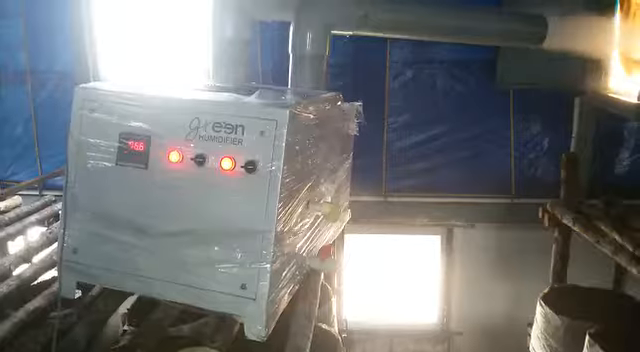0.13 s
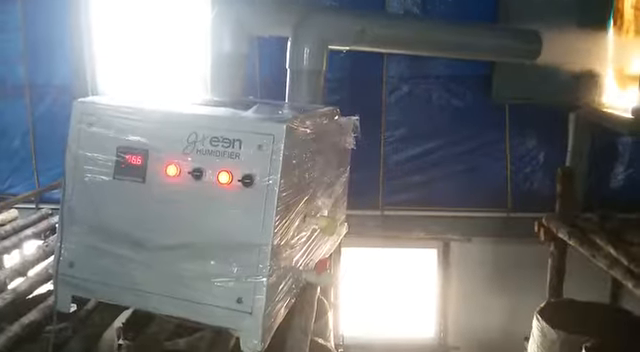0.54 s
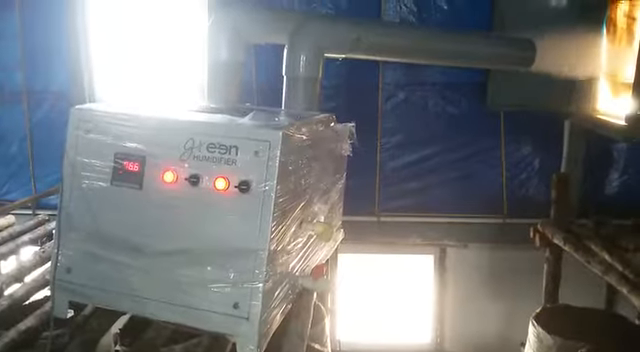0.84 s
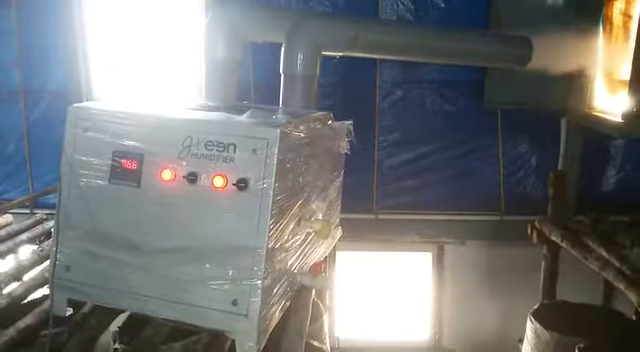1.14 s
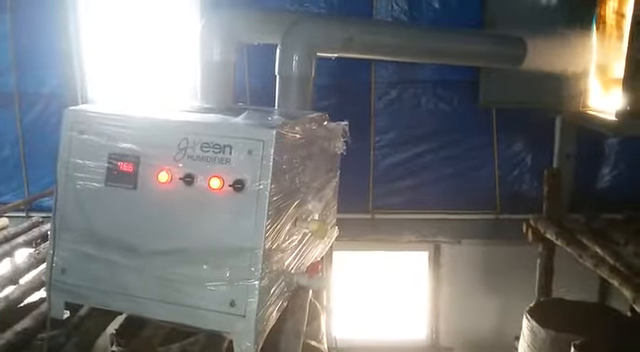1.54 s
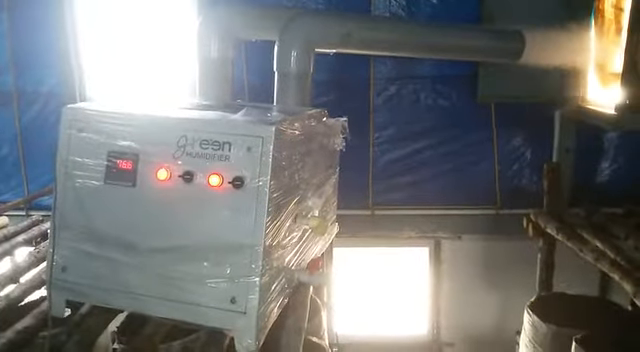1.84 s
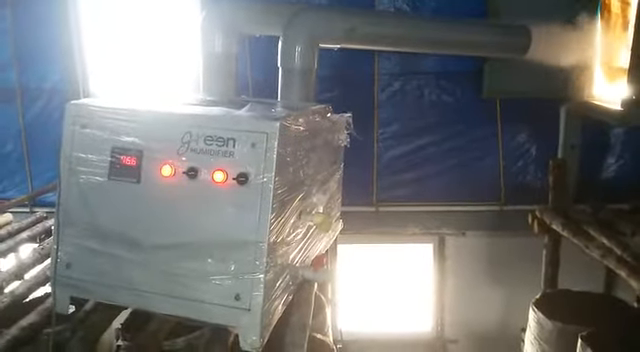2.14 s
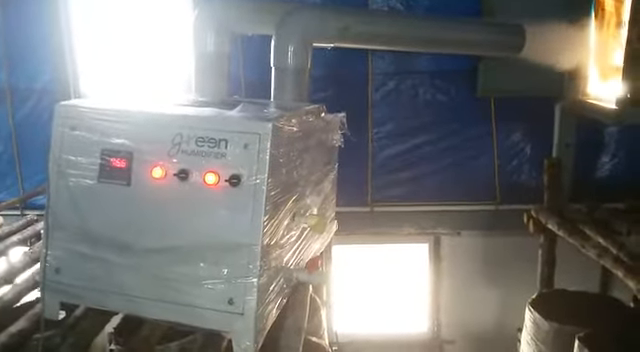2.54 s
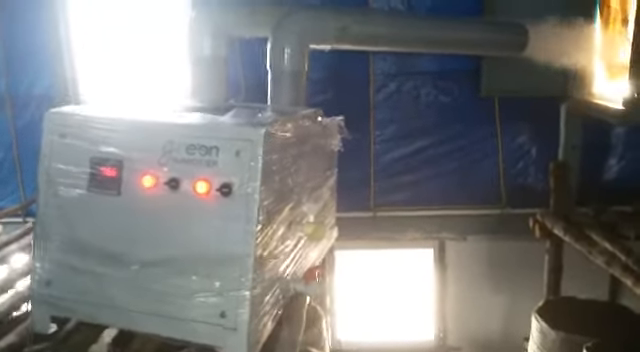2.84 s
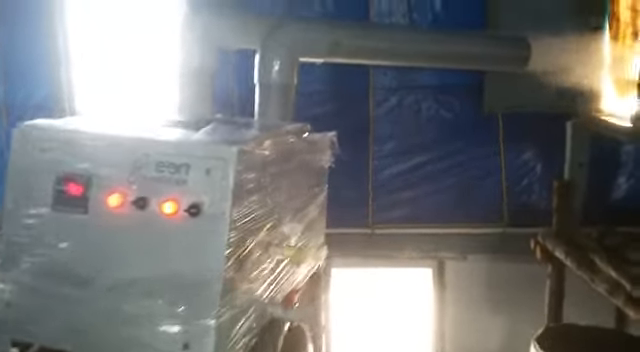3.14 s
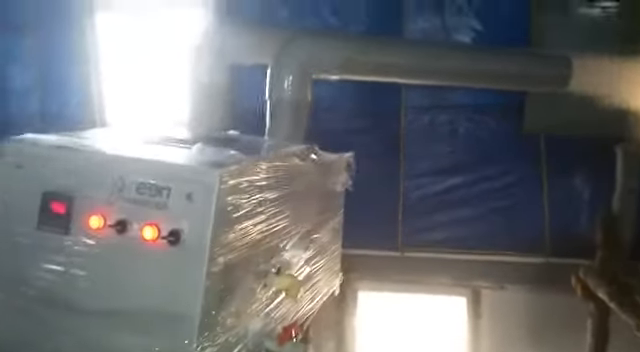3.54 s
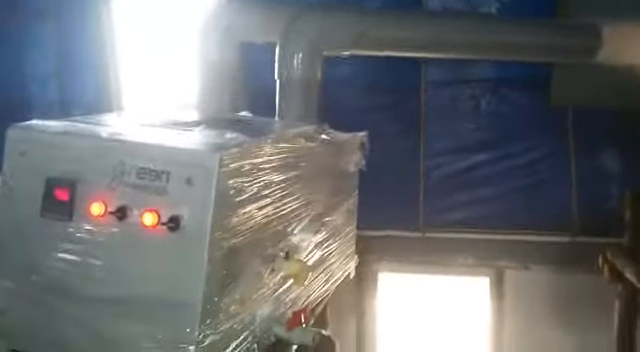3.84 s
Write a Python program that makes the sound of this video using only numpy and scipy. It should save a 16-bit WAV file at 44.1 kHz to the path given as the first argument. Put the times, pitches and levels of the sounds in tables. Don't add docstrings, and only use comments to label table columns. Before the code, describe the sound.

A humidifier fan hums steadily with rumbling airflow and hissing mist, then water gurgles briefly twice.

```python
import sys
import numpy as np
from scipy import signal
from scipy.fft import rfft, irfft
from scipy.io import wavfile

SR = 44100
rng = np.random.default_rng(int(sys.argv[2]) if len(sys.argv) > 2 else 0)


def voltage_ratio(level):
    return 10 ** (np.asarray(level, float) / 20)


def log_audio(samples):
    frames = np.atleast_2d(samples).T
    limited = np.clip(frames, -1, 1)
    pcm = np.round(limited * 32767).astype(np.int16)
    wavfile.write(sys.argv[1], SR, pcm)


N = 176400

BLADE_ORDERS = [4, 8, 12, 16, 20]


def at_hz(points, hz):
    table_hz, table_db = np.transpose(points)
    return np.interp(np.log(hz), np.log(table_hz), table_db)


def drift(rate_hz):
    pole = np.exp(-80 * np.pi * rate_hz / SR)
    noise = rng.standard_normal(N // 40 + 2002)
    slow = signal.lfilter([1], [1, -2 * pole, pole * pole], noise)[2000:]
    return np.interp(np.arange(N) / 40, np.arange(len(slow)), slow / slow.std())


def shaft_turns():
    speed_hz = 21.675 * (1 + 0.00034 * drift(1.54))
    return np.cumsum(speed_hz) / SR


def fan(turns):
    blade_db = [-45, -40, -42, -40, -50.5]
    motor_orders = [(0, 1), (33, 1), (34, 1), (35, 1), (36, 1), (34, 2)]
    motor_db = [-53.5, -47, -46, -44.5, -42.5, -50.5]
    mains = 99.85 * np.arange(N) / SR
    orders = [(order, 0) for order in BLADE_ORDERS] + motor_orders
    hum = np.zeros(N)
    for (shaft_order, mains_order), db in zip(orders, blade_db + motor_db):
        level = voltage_ratio(db + 1 * drift(3.7))
        cycles = shaft_order * turns + mains_order * mains + rng.random()
        hum += np.sqrt(2) * level * np.sin(2 * np.pi * cycles)
    return hum


def airflow(spectrum, patchy_db):
    # (centre [Hz], width [Hz], gain [dB])
    duct = [(62, 15, -4.5), (260, 50, 1.5), (208, 64, 2), (350, 200, 1.5), (470, 33, -3), (540, 50, -1),
            (700, 160, 2.5), (875, 110, -2.5), (986, 120, -2.5), (1105, 150, 2.5), (1655, 250, 3),
            (1970, 310, -2), (2450, 280, 1.5)]
    hz = np.maximum(np.arange(N // 2 + 1) * SR / N, 1)
    duct_db = np.zeros(len(hz))
    for centre, width, db in duct:
        duct_db += db / (1 + (2 * (hz - centre) / width) ** 2)
    colour = rfft(rng.standard_normal(N)) * voltage_ratio(at_hz(spectrum, hz) + duct_db)
    place = np.clip(1.5 * np.log2(hz / 40), 0, 13)
    together = drift(1.8)
    out = np.zeros(N)
    for k in range(14):
        share = np.clip(1 - abs(place - k), 0, 1)
        flicker_db = patchy_db * (0.13 * together + drift(10.0))
        out += irfft(colour * share, N) * voltage_ratio(flicker_db)
    return out / out.std()


def air_rumble():
    # (frequency [Hz], density [dB per Hz])
    rumble_spectrum = [(12, -67), (20, -37), (69, -15), (123, -9.5), (178, -2), (345, 0.5), (543, -4.5),
                       (870, -3), (1300, -12), (1690, -88), (2860, -120)]
    return voltage_ratio(-30.5) * airflow(rumble_spectrum + [(2600, -45), (20000, -90)], patchy_db=1.3)


def mist_hiss(turns):
    # (frequency [Hz], density [dB per Hz])
    hiss_spectrum = [(530, -28), (900, -3.5), (984, -10.5), (1140, -10.5), (1360, -11), (1900, -13),
                     (6010, -17), (9940, -27.5), (13000, -32.5)]
    hiss = airflow([(20, -99), (500, -40)] + hiss_spectrum + [(16000, -35)], patchy_db=0.6)
    throb = 1 + 0.04 * np.sin(2 * np.pi * BLADE_ORDERS[0] * turns)
    return voltage_ratio(-34.5) * throb * hiss


def gurgles():
    # (time [s], pitch [Hz], level [dB], length [s])
    bubbles = [
        (3.925, 700, -28.5, 0.071),
        (3.42, 870, -29, 0.042),
    ]
    rise = 0.086
    out = np.zeros(N)
    for start, pitch_hz, db, length in bubbles:
        u = np.clip((np.arange(N) / SR - start) / length, 0, 1)
        cycles = pitch_hz * length * u * (1 + rise * u / 2)
        out += voltage_ratio(db) * np.sin(np.pi * u) * np.sin(2 * np.pi * cycles)
    return out


def side_flickers():
    # (time [s], low edge [Hz], high edge [Hz], level [dB])
    flickers = [
        (1.117, 7000, 8300, -55),
        (3.345, 5600, 6700, -49),
        (3.392, 4300, 5500, -48),
    ]
    length_s = 0.046
    side = np.zeros(N)
    for start, low, high, db in flickers:
        band_filter = signal.butter(6, [low, high], "band", fs=SR, output="sos")
        band = signal.sosfilt(band_filter, rng.standard_normal(N))
        swell = np.sin(np.pi * np.clip((np.arange(N) / SR - start) / length_s, 0, 1))
        side += voltage_ratio(db) * band / band.std() * swell
    return side * [[1], [-1]]


def scene():
    turns = shaft_turns()
    mono = fan(turns) + air_rumble() + mist_hiss(turns) + gurgles()
    return np.array([mono, mono])


def band_limit(x):
    return signal.sosfilt(signal.butter(12, 14600, fs=SR, output="sos"), x)


def record(dry):
    start_s, length_s, first_step_db = 0.4175, 0.31, -35.5
    since = np.arange(N) / SR - start_s
    ramp = np.clip(voltage_ratio(first_step_db) + since / length_s, 0, 1)
    fade = (since > 0) * ramp ** 0.96
    return band_limit(dry * fade + side_flickers())


dry = scene()
out = record(dry)
log_audio(out)
```